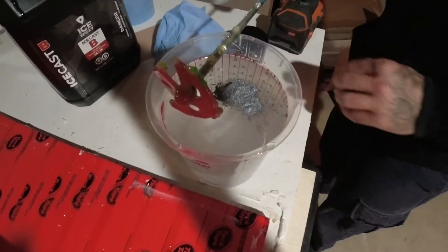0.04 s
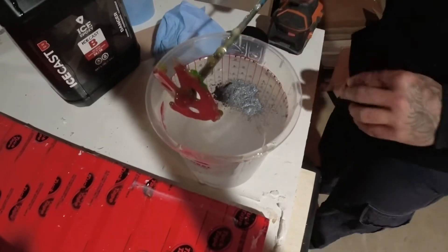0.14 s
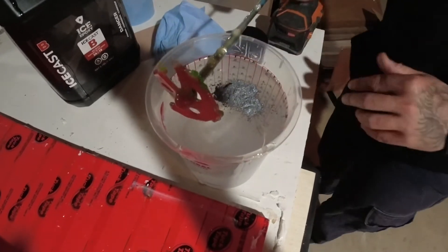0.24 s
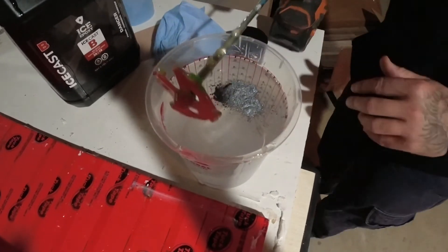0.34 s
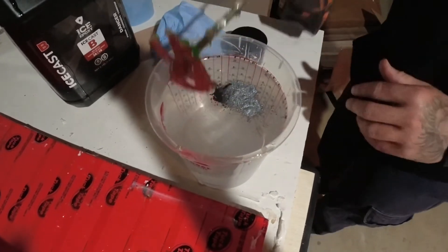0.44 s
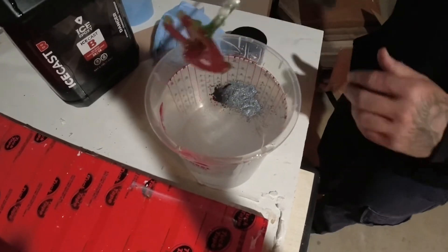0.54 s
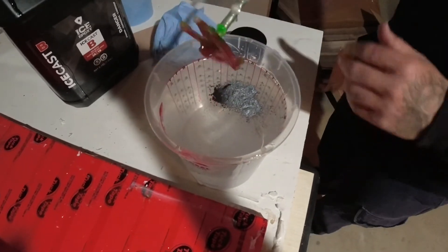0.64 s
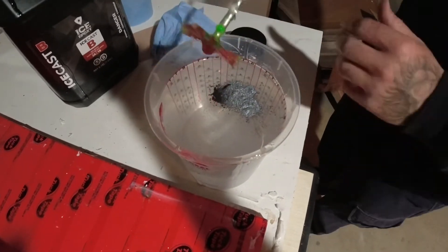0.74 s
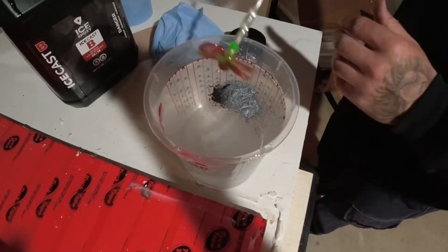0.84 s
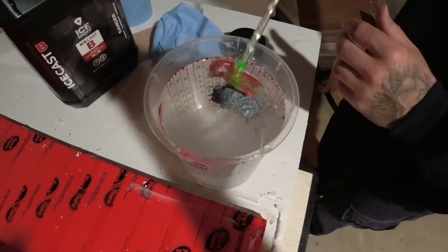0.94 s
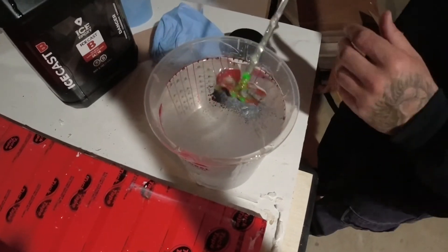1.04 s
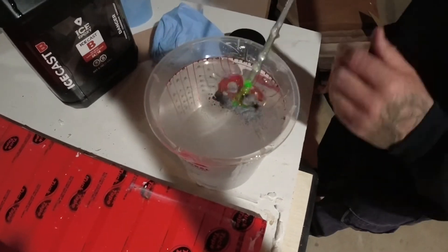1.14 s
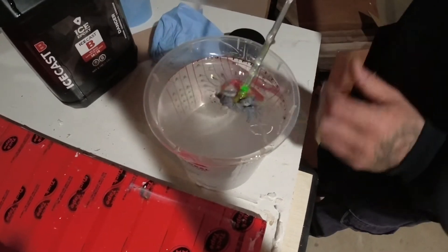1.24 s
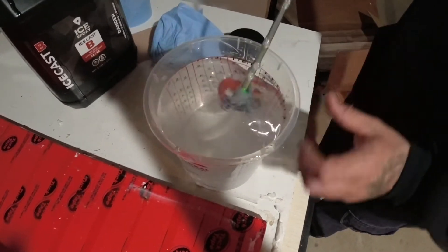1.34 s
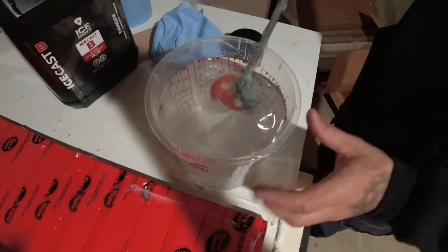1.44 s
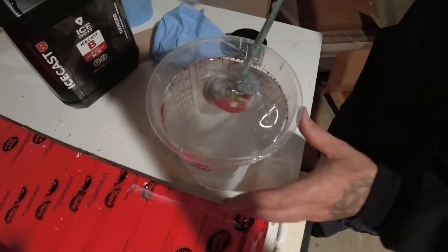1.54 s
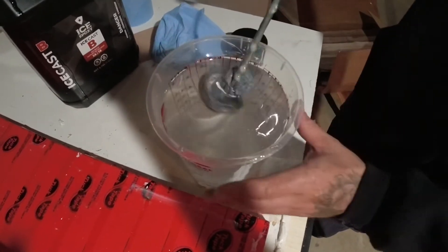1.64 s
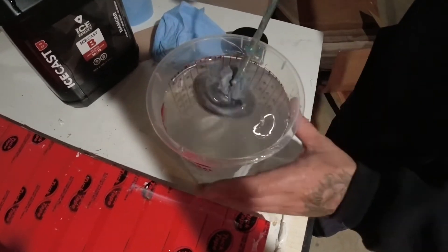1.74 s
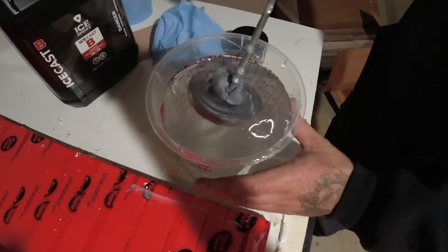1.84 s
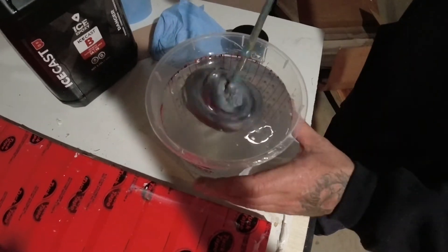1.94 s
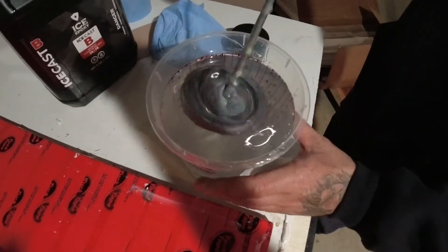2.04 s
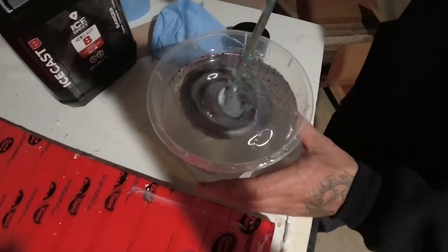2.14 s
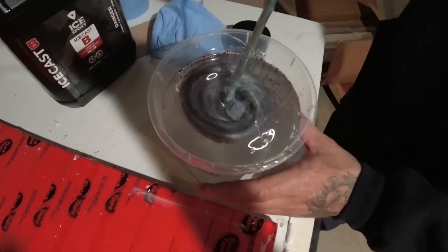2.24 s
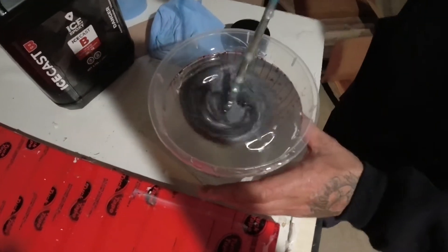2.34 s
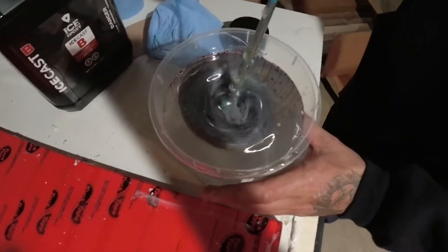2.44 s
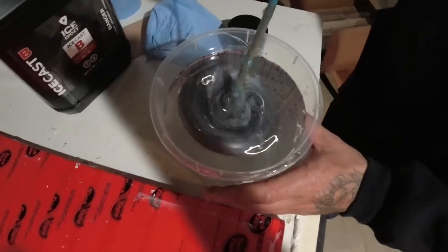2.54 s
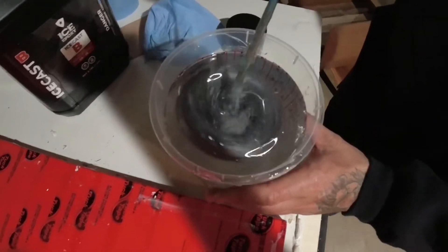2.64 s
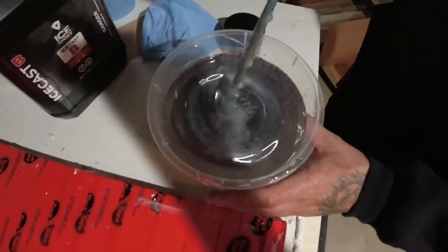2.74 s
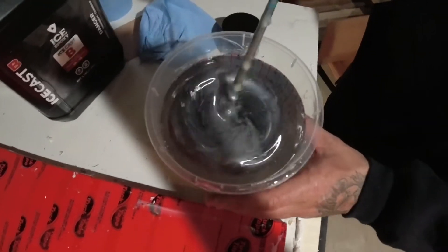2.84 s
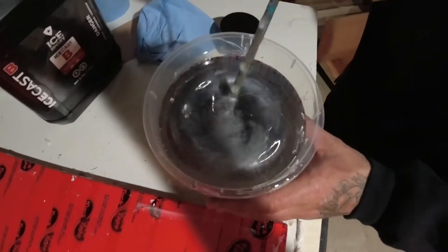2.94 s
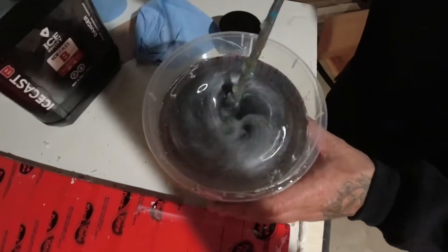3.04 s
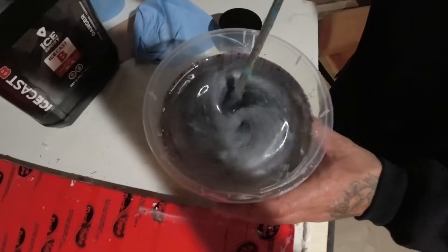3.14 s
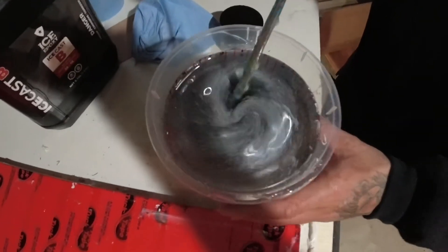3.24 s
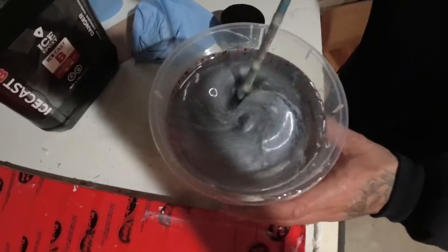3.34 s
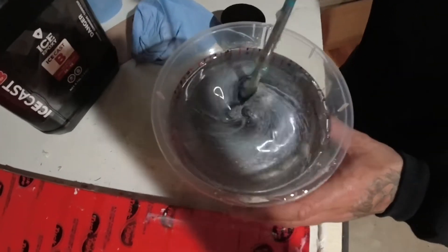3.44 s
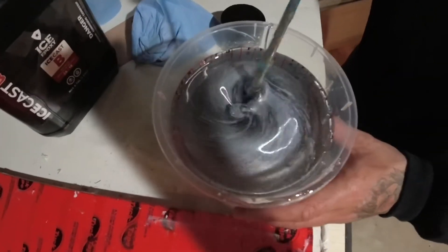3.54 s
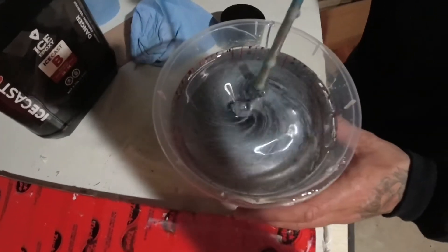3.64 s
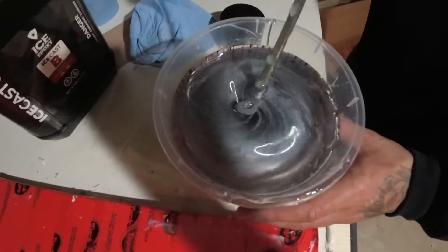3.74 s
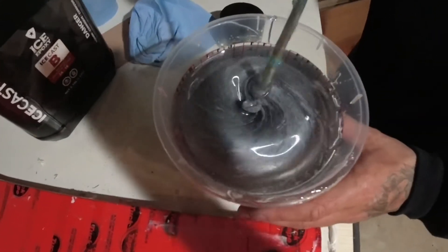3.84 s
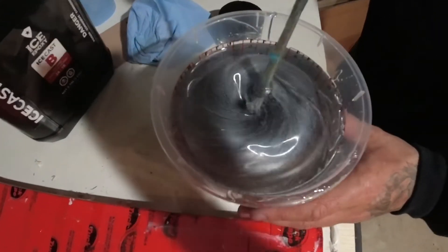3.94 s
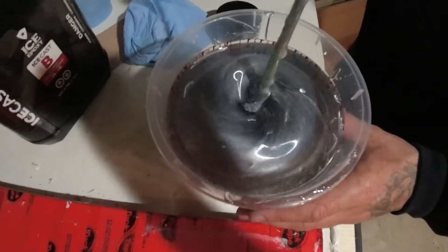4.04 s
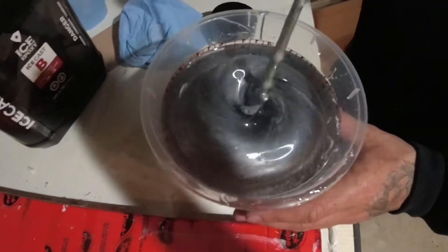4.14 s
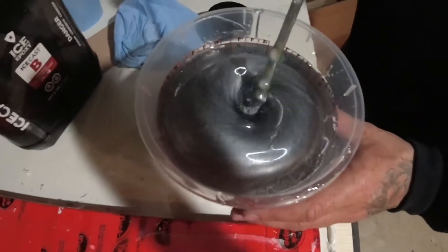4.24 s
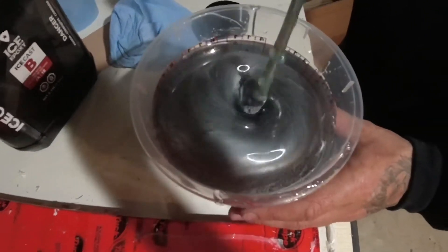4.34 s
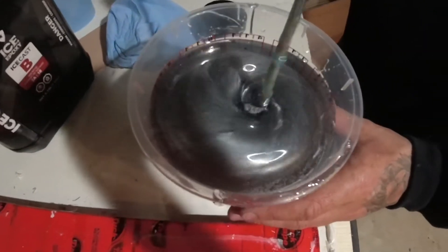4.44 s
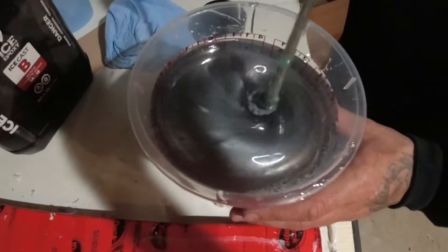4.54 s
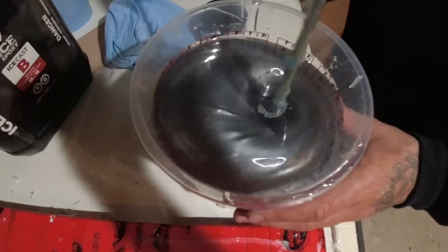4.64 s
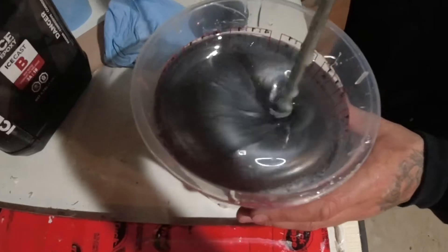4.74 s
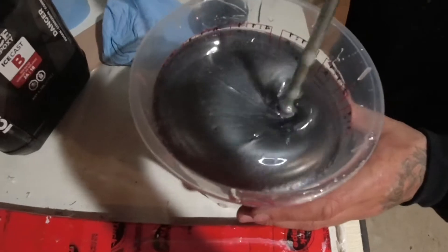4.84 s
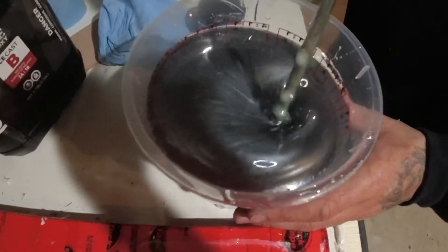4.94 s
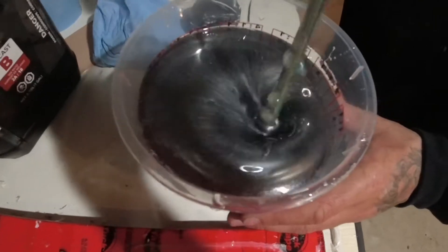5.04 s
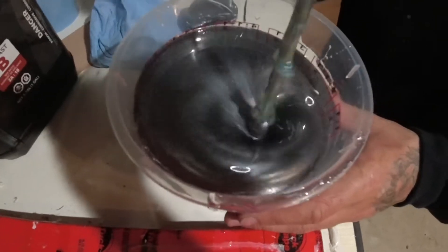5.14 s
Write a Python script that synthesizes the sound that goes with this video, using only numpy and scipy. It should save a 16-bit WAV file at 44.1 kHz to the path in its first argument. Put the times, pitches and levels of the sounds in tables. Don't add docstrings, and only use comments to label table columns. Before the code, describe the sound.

Close, dry indoor sound: over a second of near silence with soft sleeve rubs, light plastic and table taps, then a hard gear click. A geared electric motor spins up in a buzzing, nasal whine over airy hiss, reaches its top pitch, sags in pitch and loudness under load, climbs back and holds steady, still running at the cut.

```python
import sys
import numpy as np
from scipy import signal
from scipy.fft import irfft
from scipy.io import wavfile
from scipy.ndimage import uniform_filter1d

SR = 44100
rng = np.random.default_rng(int(sys.argv[2]) if len(sys.argv) > 2 else 0)


def volts_from_db(level):
    exponent = np.asarray(level, float) / 20
    return 10 ** exponent


def inscribe(sig):
    pcm = np.round(np.clip(np.atleast_2d(sig).T, -1, 1) * 32767)
    wavfile.write(sys.argv[1], SR, pcm.astype(np.int16))


N = 229275
T = np.arange(N) / SR
COARSE_T = T[::50]
HOP, HZ = 256, np.fft.rfftfreq(1024, 1 / SR)
FRAME_T = np.arange(N // HOP + 2) * HOP / SR

# [f/Hz, side minus mid/dB]
WIDTH = [(60, -5), (125, -8.5), (250, -12.5), (500, -20.5), (900, -24), (1350, -18), (2100, -10),
         (4000, -7.5), (8000, -3.5), (14000, -1)]
# [t/s, gear mesh rate headed for/Hz, lag/s]; ten meshes per shaft turn
TRIGGER = [
    (1.315, 1024, .434),
    (2.203, 1342.1, .246),
    (2.473, 1363.8, .48),
    (2.986, 934.2, .42),
    (3.547, 1245.1, .168),
    (3.852, 1338.6, .429),
]
# [t/s, level/dB]
FACING = [(1.3, 2), (2.3, -4.5), (2.8, -4.5), (3.3, 0), (3.75, 0.5), (3.95, 1.5), (4.5, 4.5), (4.8, 4),
          (5.2, 2.5)]


def evened(x):
    return x / np.sqrt(np.mean(abs(x) ** 2) + 1e-20)


def read(points, hz):
    f, value = np.transpose(points)
    return np.interp(np.log(hz + 1), np.log(f + 1), value)


def follow(rows, t):
    s, *columns = np.transpose(rows)
    return [np.interp(t, s, c) for c in columns]


def drift(top_hz, count=1):
    step = np.arange(0, N + 100, 100) / SR
    f = np.geomspace(top_hz / 12, top_hz, 12)[:, None]
    rows = []
    for phase in rng.random((count, 12)):
        waves = np.sin(2 * np.pi * (f * step + phase[:, None])) / np.sqrt(f)
        rows.append(np.interp(T, step, evened(waves.sum(0))))
    return np.array(rows)


def swells(rows, still_db):
    s, length_s, *columns = np.transpose(rows)[:, :, None]
    bell = np.exp(-((FRAME_T - s) / length_s) ** 2)
    return [10 * np.log10(volts_from_db(2 * low) + (volts_from_db(2 * db) * bell).sum(0)) for db, low in zip(columns, still_db)]


def band(lo_hz, hi_hz):
    return -10 * np.log10((1 + (lo_hz / (HZ + 1)) ** 6) * (1 + (HZ / hi_hz) ** 6))


def above(hz, order):
    return 1 / (1 + (hz / (HZ + 1)) ** order)[:, None]


def unit(colour_db):
    return (colour_db - 10 * np.log10(np.mean(volts_from_db(2 * colour_db))))[:, None]


def coloured(mid, field_db, patchy_db, width_db=0.):
    z = signal.stft(np.array([mid, rng.standard_normal(N)]), nperseg=1024, noverlap=768)[2]
    patches = rng.standard_normal(z.shape[:0:-1]).T
    patches = evened(uniform_filter1d(uniform_filter1d(patches, 10, 0), 10, 1))
    z = z * volts_from_db(field_db[:, :z.shape[2]] + patchy_db * patches)
    side = z[1] * volts_from_db(np.minimum(read(WIDTH, HZ) + width_db, 0))[:, None]
    return signal.istft(np.array([z[0] + side, z[0] - side]), nperseg=1024, noverlap=768)[1][:, :N]


def tone(turns, hz, gain):
    lead = np.interp(T, T[::200], np.arctan(volts_from_db(read(WIDTH, hz[::200]))))
    return np.sqrt(2) * gain / np.cos(lead) * np.cos(2 * np.pi * turns + np.array([[1], [-1]]) * lead)


def settle(start, goals):
    squeeze_s = .111
    out = np.full(len(COARSE_T), float(start))
    for (s, _, lag_s), goal in zip(TRIGGER, goals):
        decay = np.exp(-np.maximum(COARSE_T - s, 0) / lag_s)
        out = np.where(COARSE_T >= s, goal + (np.interp(s, COARSE_T, out) - goal) * decay, out)
    for _ in range(4):
        out = uniform_filter1d(out, size=round(squeeze_s * SR / 50), mode="nearest")
    return np.interp(T, COARSE_T, out)


def air_and_rustle():
    # [f/Hz, density/dB per Hz]
    air = [(88, -26), (150, 0), (180, -42), (237, 2), (290, -20), (494, -0.5), (1210, -19), (1780, -13),
           (2100, -29), (12000, -45), (15600, -83), (22000, -120)]
    # [t/s, length/s, body level/dB, sheen level/dB]
    rustle = [
        (.16, 0.11, -85, -75),
        (.55, 0.25, -68, -82.5),
        (.81, 0.086, -64.5, -77),
        (1.0, .1, -66.5, -85),
        (1.28, 0.073, -58, -73),
    ]
    body_db, sheen_db = swells(rustle, (-76, -95))
    parts = [unit(read(air, HZ)) - 84 + 0 * FRAME_T,
             unit(band(260, 1900)) + body_db - 11.5,
             unit(band(2700, 4300)) + sheen_db - 8]
    field_db = 10 * np.log10(sum(volts_from_db(2 * p) for p in parts))
    return coloured(rng.standard_normal(N), field_db, patchy_db=3.5, width_db=11)


def thuds():
    # [t/s, length/s, deep level/dB, upper level/dB]
    bumps = [(.18, 0.048, -56.5, -80), (.35, 0.028, -62, -43), (.97, .06, -63, -72), (1.25, .1, -67, -80),
             (1.7, 0.2, -63.5, -71), (2.13, 0.096, -52, -43), (2.45, 0.14, -51, -42.5),
             (2.75, 0.063, -73, -44), (3.08, 0.06, -57.5, -49), (3.3, .1, -57, -54),
             (3.62, 0.092, -55, -51), (3.92, 0.057, -53.5, -44), (4.1, 0.058, -53, -56),
             (4.4, 0.1, -62.5, -50), (5.0, 0.22, -66, -74)]
    deep_db, upper_db = swells(bumps, (-69, -80))
    out = np.zeros((2, N))
    for lo_hz, hi_hz, db, same in ((12, 49, deep_db + 4.5, 0.38), (66, 212, upper_db - 10, 0.88)):
        sos = signal.butter(2, (lo_hz, hi_hz), "band", fs=SR, output="sos")
        a, b = signal.sosfilt(sos, rng.standard_normal((2, N)))
        pair = np.array([a, same * a + np.sqrt(1 - same ** 2) * b])
        out += evened(pair) * volts_from_db(np.interp(T, FRAME_T, db))
    return out


def mains_hum():
    # [f/Hz, rms level/dB]
    lines = [(59.6, -65), (119.7, -65), (180, -92), (240, -78), (359, -88)]
    out = np.zeros(N)
    for (hz, db), waver in zip(lines, drift(4.1, count=len(lines))):
        out += np.sqrt(2) * volts_from_db(db + 0.68 * waver) * np.sin(2 * np.pi * (hz * T + rng.random()))
    return out


def knock(hz, top_hz, t60_s, ring_share):
    t = np.arange(4000) / SR
    noise = rng.standard_normal(4000)
    burst = noise * volts_from_db(-60 * t / t60_s) * np.minimum(t / .0006, 1)
    burst = signal.sosfilt(signal.butter(6, top_hz, fs=SR, output="sos"), burst)
    snap = signal.lfilter([1, -1], [1, -1.82, .826], burst)
    peak = signal.iirpeak(hz, 4 + hz / 800, fs=SR)
    ring = signal.lfilter(*peak, signal.lfilter(*peak, burst))
    body = ring_share * evened(ring) + (1 - ring_share) * evened(snap)
    tick_band = signal.butter(7, (500, 4300), "band", fs=SR, output="sos")
    tick = signal.sosfilt(tick_band, noise * volts_from_db(-60 * t / .015))
    tick_gain = .25 * min(hz / 900, 1)
    return body / abs(body).max() + tick_gain * tick / abs(tick).max()


def handling_knocks():
    # [t/s, peak level/dB, ring f/Hz]
    dull = [(.347, -54, 1470), (.361, -61, 800), (.372, -67, 1390), (.464, -63.5, 1210), (.604, -55.5, 875),
            (.996, -55, 310), (1.13, -62, 756), (1.189, -48, 1340), (1.239, -53, 740)]
    crisp = [(.133, -63, 840), (.303, -47, 710), (.308, -46, 514), (.309, -57, 3900), (.317, -44.5, 344),
             (.326, -54, 397), (.332, -51, 450), (.602, -53, 1920), (.635, -61, 550), (1.048, -60, 326),
             (1.196, -41.5, 3850), (1.272, -52, 2900)]
    ringing = [(.464, -63, 4500), (.552, -59.5, 500), (.553, -62, 1250), (.602, -58.5, 2780),
               (.958, -50.5, 1480), (1.195, -56, 7600), (1.196, -65, 11500), (2.127, -34.5, 335)]
    rebound = [
        (1.307, -30, 1970),
    ]
    out = np.zeros(N)
    # (knocks, snap top/Hz, added top per ring Hz, t60/s, ring share)
    for rows, top_hz, lift, t60_s, ring_share in ((dull, 1600, 0, .05, .39), (crisp, 4600, 0, .04, .5),
                                                  (ringing, 900, 1.4, .03, .8), (rebound, 9100, 0, .044, .3)):
        for s, db, hz in rows:
            out[round(s * SR):][:4000] += volts_from_db(db) * knock(hz, top_hz + lift * hz, t60_s, ring_share)
    return out


def gear_clack():
    # [f/Hz, level/dB, t60/s]
    modes = [(1370, -11.5, 0.0065), (2760, -9.5, 0.0036), (4080, -28.5, 0.015)]
    start_s, rise_s = 1.2888, .00055
    t = np.arange(4000) / SR
    ring = sum(volts_from_db(db - 60 * t / t60_s) * np.sin(2 * np.pi * hz * t) for hz, db, t60_s in modes)
    out = np.zeros(N)
    out[round(start_s * SR):][:4000] -= ring * np.minimum(t / rise_s, 1)
    return out


def room(x):
    # [f/Hz, t60/s]
    decay = [(200, 0.13), (1000, 0.096), (4000, 0.11), (12000, 0.093)]
    taps = np.zeros((2, SR // 2))
    at = np.arange(120, SR // 2 - 20, 20) + rng.integers(0, 20, (2, (SR // 2 - 121) // 20))
    np.put_along_axis(taps, at, rng.choice([-1., 1.], at.shape), 1)
    hz, t, z = signal.stft(taps, SR, nperseg=256)
    tail = signal.istft(z * volts_from_db(-60 * t / read(decay, hz)[:, None]), SR, nperseg=256)[1]
    return signal.fftconvolve(x[None], tail / np.linalg.norm(tail[0]), axes=1)[:, :N]


def gear_whine(mesh_hz, turns, speed_db):
    # [multiple of mesh rate], each with [level at full speed/dB]
    orders, order_db = (1, 1.02, 1.5, 2, 2.973, 3, 4, 5, 6, 7, 8, 9, 11), (-28, -34.5, -40, -38.5, -40, -41.5, -38.5, -38, -41.5, -51.5, -61,
                                        -61, -69)
    sidebands, sideband_db = (.3, 2.1, 2.3, 4.093, 5.7, 8.2, 9.2, 11.2), (-64, -56, -57, -50, -55.5, -56, -69, -57)
    rough_orders = (.5, 2.973, 3, 4.093, 5.017)
    # [f/Hz, width/Hz, level/dB]
    shell = [(600, 170, -19), (1181, 165, -10), (1327, 45, -14), (1790, 280, -4), (2160, 170, -.5),
             (2470, 330, -4.5), (3400, 340, -5.5), (4150, 300, -4), (4750, 480, -3.5), (5600, 650, -4.5),
             (7810, 480, -.5), (8950, 370, 7.5), (12270, 800, 6), (14653, 446, 7)]
    slope, floor_db = .8, -32
    settled_hz, settled_width_hz = 1330, 45
    coarse_hz = mesh_hz[::50]
    settled_db = -12 * (np.maximum(settled_hz - coarse_hz, 0) / settled_width_hz) ** 2
    facing_db = follow(FACING, COARSE_T)[0]
    lines = [*orders, *sidebands]
    out = np.zeros((2, N))
    for order, db, waver in zip(lines, [*order_db, *sideband_db], drift(30, count=len(lines))):
        hz = order * coarse_hz
        if order in orders:
            power = sum(volts_from_db(2 * (d - 12 * ((hz - f) / w) ** 2)) for f, w, d in shell)
            power = power + volts_from_db(2 * floor_db) * 1000 / np.maximum(hz, 1000)
            level = np.sqrt(power) * volts_from_db(db + slope * speed_db)
        else:
            level = volts_from_db(db + settled_db)
        level = level * volts_from_db(-.6 * facing_db * np.exp(-((hz - 4300) / 1400) ** 2))
        loose = 1.5 if order in rough_orders else 1
        gain = np.interp(T, COARSE_T, level) * volts_from_db(2 * loose * waver - .3)
        out += tone(order * turns + .03 * loose * waver + rng.random(), order * mesh_hz, gain)
    return out


def controller_whistle(mesh_hz):
    goals_db = (-55, -44, -37, -52, -41.5, -58)
    switch_hz = 1936 + 0 * T
    sum_hz = 2 * switch_hz + mesh_hz
    sum_db = np.maximum(-46 - 12 * ((sum_hz - 4660) / 220) ** 2, -62)
    pitches = (switch_hz, 2 * switch_hz, sum_hz)
    levels_db = (settle(-43, goals_db), -61, sum_db)
    out = np.zeros((2, N))
    for hz, db, waver in zip(pitches, levels_db, drift(16, count=3)):
        out += tone(np.cumsum(hz) / SR, hz, volts_from_db(db + 2.4 * waver))
    return out


def motor_hiss(turns, speed_db):
    # [f/Hz, density/dB per Hz]
    housing = [(88, -52), (150, -16.5), (439, -12.5), (534, -7), (905, -9), (1240, 1.5), (1420, -3),
               (1900, -5.5), (2870, -7.5), (4000, -1), (6770, -15), (9080, -8), (10800, -17),
               (15100, -19.5), (16000, -55)]
    # [f/Hz, width/Hz, level/dB]
    humps = [(1250, 210, -3.5), (1850, 305, 4), (4250, 840, -4.5), (5310, 1800, 4)]
    pattern = evened(irfft(np.exp(2j * np.pi * rng.random(121)), 4096))
    rattle = np.interp(turns / 10 % 1 * 4096, np.arange(4096), pattern)
    throb = 1 + 0.12 * np.cos(2 * np.pi * turns / 10) + 0.11 * np.cos(2 * np.pi * turns * .02)
    source = 0.27 * rattle + throb * rng.standard_normal(N)

    facing_db = follow(FACING, FRAME_T)[0]
    hiss_db = -33 + 1.39 * np.interp(FRAME_T, COARSE_T, speed_db) - 0.082 * facing_db
    since_s = np.maximum(FRAME_T - TRIGGER[0][0], 0)
    dull_db = -11.5 * np.exp(-since_s / 0.037)
    airy_db = -10 * np.exp(-since_s / .15)
    colour_db = read(housing, HZ) + sum(db * np.exp(-((HZ - f) / w) ** 2) for f, w, db in humps)
    upper, top = above(2600, 6), above(6600, 8)
    field_db = unit(colour_db) + hiss_db + upper * dull_db - 0.75 * dull_db - 3.5 * top
    field_db = field_db + (upper - top) * (1 - 0.51 * facing_db)
    field_db = field_db + above(11000, 8) * airy_db
    field_db = field_db + np.exp(-((HZ - 3950) / 400) ** 2)[:, None] * facing_db
    return coloured(source, field_db, patchy_db=2)


def drill():
    start_hz, full_hz = 252, 1300
    on = np.clip((T - 1.281) / 0.0047, 0, 1)
    mesh_hz = settle(start_hz, np.transpose(TRIGGER)[1]) * (1 + .001 * drift(40)[0])
    turns = np.cumsum(mesh_hz) / SR
    speed_db = 20 * np.log10(mesh_hz[::50] / full_hz)
    whine = gear_whine(mesh_hz, turns, speed_db)
    return on * (whine + controller_whistle(mesh_hz) + motor_hiss(turns, speed_db))


def scene():
    workshop = air_and_rustle() + thuds() + mains_hum()
    knocks = handling_knocks() + gear_clack()
    return workshop + knocks + volts_from_db(-16) * room(knocks) + drill()


def band_limit(x):
    return signal.sosfilt(signal.butter(12, 16900, fs=SR, output="sos"), x)


def record(dry):
    return band_limit(dry)


dry = scene()
out = record(dry)
inscribe(out)
```